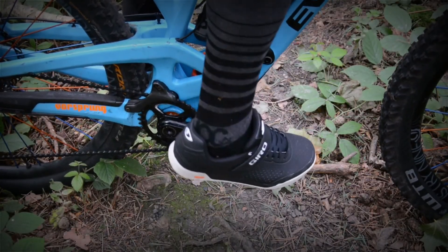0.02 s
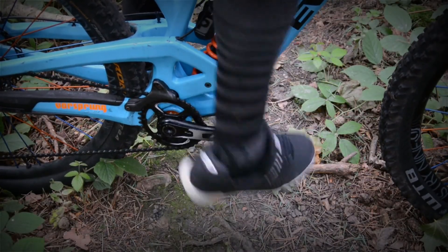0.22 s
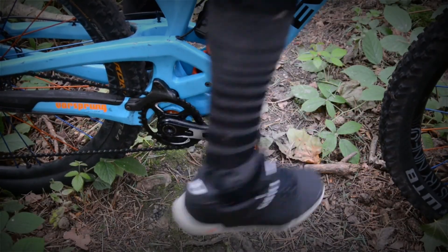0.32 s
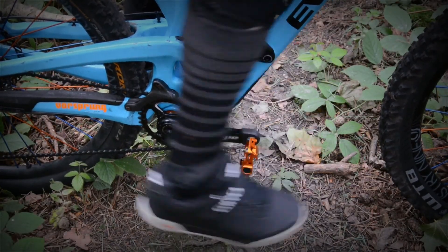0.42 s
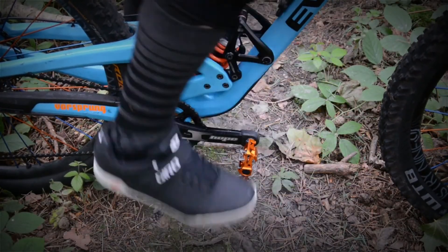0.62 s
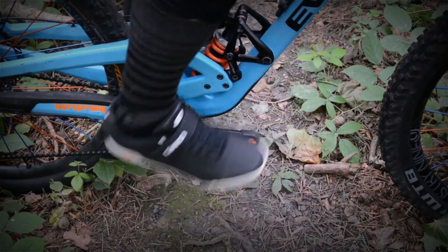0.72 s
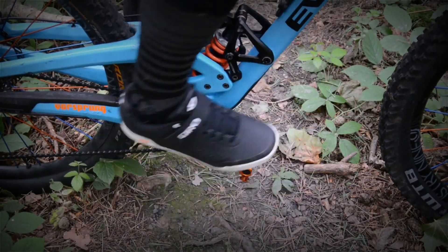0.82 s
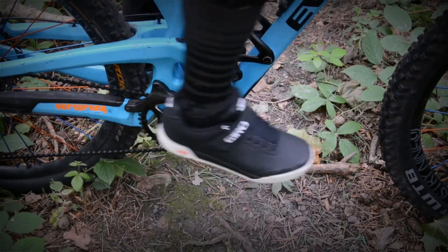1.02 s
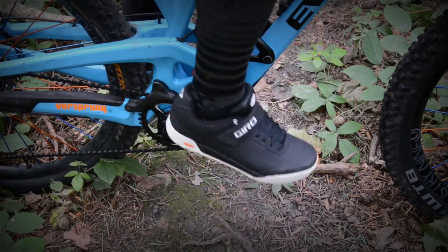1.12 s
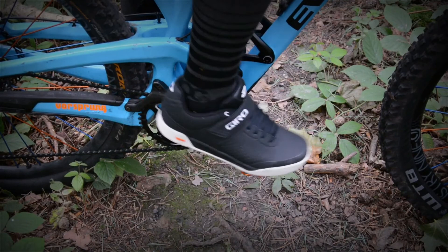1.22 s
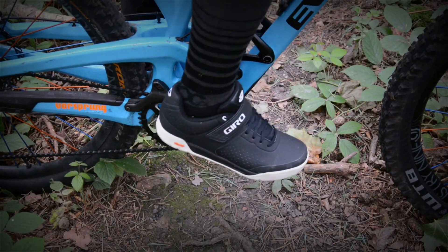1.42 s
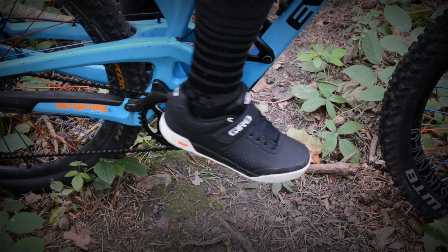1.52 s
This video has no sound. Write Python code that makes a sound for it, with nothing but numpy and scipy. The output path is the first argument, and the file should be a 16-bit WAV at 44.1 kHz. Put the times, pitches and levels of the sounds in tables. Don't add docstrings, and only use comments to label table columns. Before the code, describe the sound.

Close up beside a wooded road, a shoe snaps loudly out of a bike pedal; quiet ticks, a quick clatter of knocks and tiny taps follow, with a soft late echo from trees and steady faint hiss.

```python
import sys
import numpy as np
from scipy import signal
from scipy.fft import rfft, irfft
from scipy.io import wavfile
from scipy.ndimage import uniform_filter1d

SR = 44100
rng = np.random.default_rng(int(sys.argv[2]) if len(sys.argv) > 2 else 0)


def voltage_ratio(decibels):
    exponent = np.asarray(decibels, float) / 20
    return 10 ** exponent


def to_wav(sig):
    pcm = np.clip(np.atleast_2d(sig), -1, 1) * 32767
    pcm = np.round(pcm).astype(np.int16)
    wavfile.write(sys.argv[1], SR, pcm.T)


N = 70560


def evened(x):
    return x / np.sqrt(np.mean(x ** 2) + 1e-20)


def loudest(x):
    return x / np.sqrt(uniform_filter1d(x ** 2, size=128).max() + 1e-20)


def read(points, hz):
    f, value = np.transpose(points)
    return np.interp(np.log(hz + 1), np.log(f + 1), value)


def add(mix, start_s, sound):
    part = mix[round(start_s * SR):][:len(sound)]
    part += sound[:len(part)]


def colour(x, points, tilt_db=0., hard_db=0.):
    hz = abs(np.fft.fftfreq(4096, 1 / SR))
    shelf_db = hard_db * np.interp(hz, [8000, 11000], [0, 1])
    octaves = np.log2(np.maximum(hz, 1000) / 3000)
    log_gain = np.log(voltage_ratio(read(points, hz) + shelf_db + tilt_db * octaves))
    taps = np.fft.ifft(np.exp(np.conj(signal.hilbert(log_gain)))).real[:2048]
    return signal.fftconvolve(x, taps)[:len(x)]


def strike(slip_s, tilt_db, hard_db, modes, crack, ring_t, crack_t60_s, rattle_db, rattle_t60_s, rise):
    # hz, gain_db
    low_cut = [(60, -45), (600, 0)]
    t = ring_t
    a, b, c = rng.standard_normal((3, len(t)))
    onset = np.minimum(t / max(slip_s * rise, 1e-4), 1)
    slips = a * (abs(b) > .7) * onset * voltage_ratio(-60 * np.maximum(t - slip_s, 0) / crack_t60_s)
    rattle = c * onset * voltage_ratio(rattle_db - 60 * t / rattle_t60_s)

    twins = [(hz * 1.044, db - 7.5, t60_s) for hz, db, t60_s in modes]
    ring = np.zeros(len(t))
    for hz, db, t60_s in list(modes) + twins:
        drive = abs(slips @ np.exp(2j * np.pi * hz * t))
        ring += voltage_ratio(db - 60 * t / t60_s) * np.sin(2 * np.pi * hz * t) / drive ** .9
    ring = colour(signal.fftconvolve(slips, ring)[:len(t)], low_cut, tilt_db, hard_db)

    z = rfft(slips + rattle)
    flat = irfft(z / np.sqrt(uniform_filter1d(abs(z) ** 2, size=70))) * (t < .15)
    return loudest(colour(flat, crack, tilt_db, hard_db)), loudest(ring)


def strikes(events, modes, crack, ring_db, echo_db, **part):
    near, far = np.zeros(N), np.zeros(N)
    t = np.arange(8192) / SR
    for start_s, force_db, slip_s, tilt_db, hard_db in events:
        crackle, ring = strike(slip_s, tilt_db, hard_db, modes, crack, t, **part)
        crackle = voltage_ratio(force_db - 2) * crackle
        ring = voltage_ratio(force_db - 2.5 + ring_db) * ring
        add(near, start_s, crackle + ring)
        add(far, start_s, voltage_ratio(echo_db) * (crackle + voltage_ratio(-4) * ring))
    return np.array([near, far])


def spring_snap():
    # start_s, force_db, slip_s, tilt_db_per_octave, hardness_db
    snaps = [
        (.2375, -42, .0003, 0, 0),
        (.2388, -7.5, 0.0026, 0, 0),
    ]
    # hz, level_db, t60_s
    modes = [(1000, -12.5, 0.02), (10480, -8, 0.03), (1297, -7, 0.03), (1680, -1.5, 0.026),
             (2130, -6.5, 0.03), (2600, -6.5, .02), (3005, 0.5, .016), (3981, -5, 0.024), (4635, -6, 0.026),
             (5450, -1.5, .04), (6296, -5.5, 0.024), (8545, -1, .035), (11430, -1.5, 0.037),
             (13500, -9, .03)]
    # hz, db_per_hz
    crack = [(40, -55), (650, -27), (1100, -11), (3000, -3), (5460, -5), (11300, -6), (14600, -14.5),
             (15800, -34)]
    return strikes(snaps, modes, crack, ring_db=-2, echo_db=-.5, crack_t60_s=.0046,
                   rattle_db=-23.5, rattle_t60_s=.16, rise=.22)


def jaw_ticks():
    # start_s, force_db, slip_s, tilt_db_per_octave, hardness_db
    ticks = [
        (.6558, -36.5, 0.0012, 3.5, 2.5),
        (.6577, -40, .0006, 2, -2),
        (.6885, -32, 0.00067, -1, -3),
        (.7503, -26.5, 0.0013, 2, -0.5),
    ]
    # hz, level_db, t60_s
    modes = [(1396, -4.5, 0.13), (1625, -1, 0.069), (1932, -2.5, 0.051), (2745, -7, 0.0523),
             (2858, 2, 0.05), (3921.3, -11, 0.026), (4330, -9.5, 0.028), (5219.5, -6, 0.057),
             (6498, -12.5, 0.0265), (7520, -2.5, 0.01741), (8365, -10, 0.01395), (8520, -13, 0.015),
             (10376, -14, 0.01249), (13200, -18, .012)]
    # hz, db_per_hz
    crack = [(500, -44), (1000, -9.5), (2840, -3.5), (5870, -10.5), (8660, -9.5), (10000, -19),
             (14000, -17.5), (15800, -28)]
    return strikes(ticks, modes, crack, ring_db=2, echo_db=-2, crack_t60_s=.006,
                   rattle_db=-16, rattle_t60_s=.09, rise=.03)


def body_knocks():
    # start_s, force_db, slip_s, tilt_db_per_octave, hardness_db
    knocks = [(.2712, -30, 0.0011, -1, -4), (.287, -39, 0.00078, -2, 4),
              (1.0435, -45.5, 0.001795, -4.5, -3), (1.0625, -33, 0.0010445, -1.5, -14),
              (1.0700, -34, .001, -6, -7.5), (1.0718, -34, 0.0016, 0, -10), (1.0783, -29.5, 0.0012, -4, 0),
              (1.0800, -24, 0.00064, -0.5, 0.5), (1.0811, -23.5, 0.0004906, 2, -1),
              (1.0826, -28.5, 0.00081, 2.5, 0), (1.096, -37.5, 0.0014, -5, -10)]
    # hz, level_db, t60_s
    modes = [(687.4, -12, 0.04), (835, -2, .045), (1314, -1, 0.048), (1843, -6.5, 0.033), (2415, -10, .02),
             (3380, -4.5, 0.016), (4476.4, -13, 0.016), (5400, -14, .02), (6927, -4.5, 0.014),
             (7722, -11, 0.019), (8560, -17, .015)]
    # hz, db_per_hz
    crack = [(100, -44.5), (400, -19.5), (1100, -9), (2000, -9), (3400, -8.5), (4000, -20.5), (6900, -15),
             (16000, -32)]
    return strikes(knocks, modes, crack, ring_db=-2.5, echo_db=-10, crack_t60_s=.0076,
                   rattle_db=-28, rattle_t60_s=.0449, rise=.5)


def plate_taps():
    # start_s, force_db, slip_s, tilt_db_per_octave, hardness_db
    taps = [
        (1.293, -60.5, .0004, 6, 4),
        (1.334, -46.5, 0.00532, 0, -14),
        (1.3888, -40.5, 0.00059, -1, -7.5),
        (1.3902, -35.5, 0.000595, 2, -14),
        (1.3918, -41, 0.0006456, 1, -14.5),
        (1.5773, -32, 0.0006, -4, -5),
        (1.5789, -33.5, 0.0008148, 0.5, 4),
    ]
    # hz, level_db, t60_s
    modes = [(800, -12.5, 0.011), (1210, 0.5, 0.0078), (1570, -1.5, 0.016), (1945, -4, 0.014),
             (2415.9, -3, 0.01027), (2900, 0, 0.015), (3286, -21, 0.00796), (5103.3, -10.5, 0.014),
             (6900, -4.5, 0.012136), (8484.5, -13, 0.011)]
    # hz, db_per_hz
    crack = [(240, -37), (600, -14), (1330, 1), (3200, -8.5), (4000, -20), (7000, -23.5), (15000, -24.5),
             (16000, -32)]
    return strikes(taps, modes, crack, ring_db=-4, echo_db=-8, crack_t60_s=.004,
                   rattle_db=-17.5, rattle_t60_s=.01, rise=.5)


def thuds():
    # start_s, level_db, pitch_hz, t60_s
    swings = [
        (.239, -32, 256, 0.017),
        (.239, -27, 377, .03),
        (.239, -22, 647, 0.01983),
        (.239, -22, 784, 0.014),
        (1.079, -38, 652.8, 0.04516),
        (1.0794, -26.5, 1325, 0.041),
        (1.330, -48, 231.7, 0.05473),
        (1.333, -45.5, 400, 0.05283),
        (1.5776, -46, 752, .02),
    ]
    # hz, gain_db
    low_cut = [(30, -36), (200, 0)]
    out, t = np.zeros(N), np.arange(4096) / SR
    for start_s, level_db, pitch_hz, t60_s in swings:
        add(out, start_s, voltage_ratio(level_db - 60 * t / t60_s) * np.sin(2 * np.pi * pitch_hz * t))
    return colour(out, low_cut)


def squeaks():
    # start_s, length_s, level_db, pitch_hz
    tones = [
        (1.323, .014, -66, 6600),
        (1.353, .017, -64, 6600),
        (1.402, .016, -67, 7000),
        (1.064, .01, -50, 6800),
    ]
    out, t = np.zeros(N), np.arange(0, .04, 1 / SR)
    for start_s, length_s, level_db, pitch_hz in tones:
        waver = 1 + .2004 * uniform_filter1d(rng.standard_normal(len(t)), size=60)
        swell = np.sin(np.pi * np.minimum(t / length_s, 1))
        tone = np.sin(2 * np.pi * np.cumsum(pitch_hz * waver) / SR)
        add(out, start_s, voltage_ratio(level_db) * swell * tone)
    return out


def sole():
    # start_s, length_s, level_db
    scuffs = [
        (.01, 0.099, -62),
        (0.082, 0.09555, -63),
        (1.026, 0.0581, -62),
        (1.083, 0.10807, -62.5),
        (1.319, 0.0635, -66),
        (1.375, .05, -62.5),
    ]
    # hz, db_per_hz
    spectrum = [(800, -10), (2500, 2.5), (7000, -4), (12000, -11.5), (16000, -27.5)]
    grains_per_s = 10000
    hits = rng.random(N) < grains_per_s / SR
    grit = hits * rng.standard_normal(N) * voltage_ratio(2 * rng.exponential(1, N))
    t, stroke = np.arange(N) / SR, np.zeros(N)
    for start_s, length_s, level_db in scuffs:
        stroke += voltage_ratio(level_db) * np.sin(np.pi * np.clip((t - start_s) / length_s, 0, 1)) ** 2
    return stroke * evened(colour(grit, spectrum))


def ports(x):
    # hz, lead_rad
    lead = [(60, 0.67), (1000, 0.57), (9000, 0.52), (11500, -0.48), (12800, 0.69), (13400, -0.2),
            (15000, -1.2), (16100, 0.5)]
    # hz, left_minus_right_db
    lean = [(60, -0.5), (150, 1.5), (380, 0.5), (950, 1.0), (2380, 1.0), (5980, 1), (15000, 1.5)]
    # hz, level_db
    apart = [(4000, -36), (8000, -22), (12000, -9), (16000, -6)]
    hz = np.fft.rfftfreq(N, 1 / SR)
    half = voltage_ratio(read(lean, hz) / 2) * np.exp(.5j * read(lead, hz))
    scatter = evened(rng.standard_normal(64)) / 8
    side = voltage_ratio(read(apart, hz)) * rfft(scatter, N)
    return irfft(rfft(x) * np.array([half + side, 1 / half - side]), N)


def woods(x):
    # hz, t60_s
    decay = [(500, 0.17), (2000, 0.56), (5000, .75), (9000, .6), (15000, .45)]
    level_db, start_s, rise_s = -22, .024, .032
    same, tilt_db_per_octave = .812, .54
    hz, t, z = signal.stft(rng.standard_normal((2, SR)), SR, nperseg=256)
    z = np.array([z[0], same * z[0] + np.sqrt(1 - same ** 2) * z[1]])
    build = np.clip((t - start_s) / rise_s, 0, 1)
    tilt_db = tilt_db_per_octave * np.log2((hz[:, None] + 100) / 3000)
    fade = voltage_ratio(tilt_db - 60 * t / read(decay, hz)[:, None])
    tail = signal.istft(z * build * fade, SR, nperseg=256)[1]
    tail = tail / np.linalg.norm(tail[0])
    return voltage_ratio(level_db) * signal.fftconvolve(x[None], tail, axes=1)[:, :N]


def road():
    # hz, db_per_hz
    spectrum = [(40, -44.5), (75, -13), (250, -18.5), (450, -10.5), (1000, -1.5), (1500, -7.5),
                (2600, -22.5), (7000, -50)]
    # hz, likeness
    likeness = [(60, 1), (180, 0.971), (550, 0.99395), (1650, 0.93596), (4970, 0.66), (15000, 0.25)]
    # hz, left_minus_right_db
    leaning = [(60, 1.0), (240, 1.0), (950, 1.6), (3770, 1.5), (15000, 0.015)]
    frames, hz = N // 256 + 5, np.fft.rfftfreq(1024, 1 / SR)
    a, b, c, d, patches = rng.standard_normal((frames, 513, 5)).T
    patches = uniform_filter1d(patches, size=10, axis=0)
    patches = evened(uniform_filter1d(patches, size=12, axis=1))
    same = np.clip(read(likeness, hz), -1, 1)[:, None]
    lean = voltage_ratio(read(leaning, hz)[:, None] / 2)
    left = a + 1j * b
    right = same * left + np.sqrt(1 - same ** 2) * (c + 1j * d)
    z = np.array([left * lean, right / lean])
    z *= voltage_ratio(read(spectrum, hz)[:, None] + 1.2 * patches)
    return voltage_ratio(-48) * evened(signal.istft(z, nperseg=1024, noverlap=768)[1][:, :N])


def hiss():
    # hz, db_per_hz
    spectrum = [(1500, -5.5), (3000, 2), (8000, -6), (15300, -11), (15650, -30)]
    a, b = rng.standard_normal((2, N))
    return voltage_ratio(-69) * evened(np.array([colour(a, spectrum), colour(.6 * a + .8 * b, spectrum)]))


def scene():
    near, far = spring_snap() + jaw_ticks() + body_knocks() + plate_taps()
    near = near + thuds() + squeaks() + sole()
    return ports(near) + woods(far) + road() + hiss()


def roll_off(x):
    return signal.sosfilt(signal.butter(12, 16530, fs=SR, output="sos"), x)


def record(dry):
    held = dry / (1 + (dry / .95) ** 8) ** (1 / 8)
    edge = signal.firwin(511, 15800, window=("kaiser", 9), fs=SR)
    return roll_off(signal.oaconvolve(held, edge[None], "same"))


dry = scene()
out = record(dry)
to_wav(out)
```